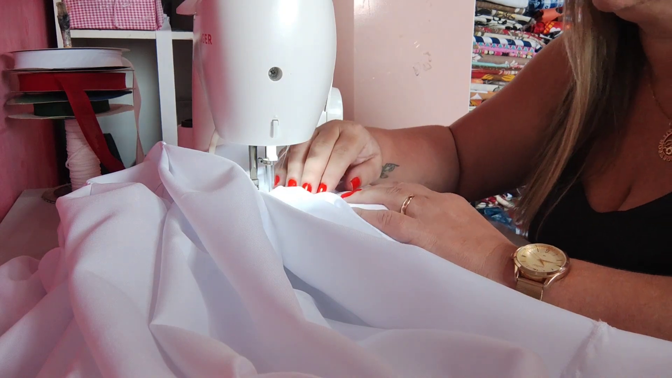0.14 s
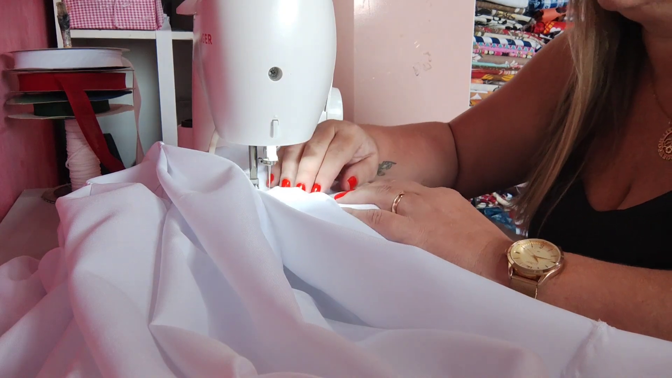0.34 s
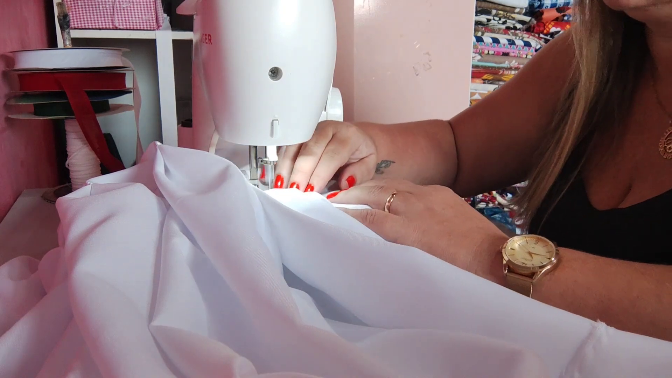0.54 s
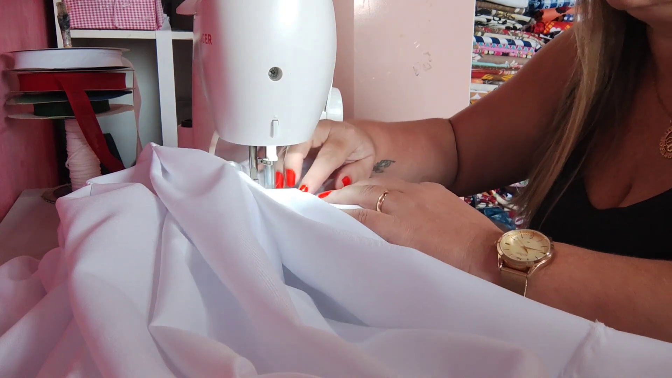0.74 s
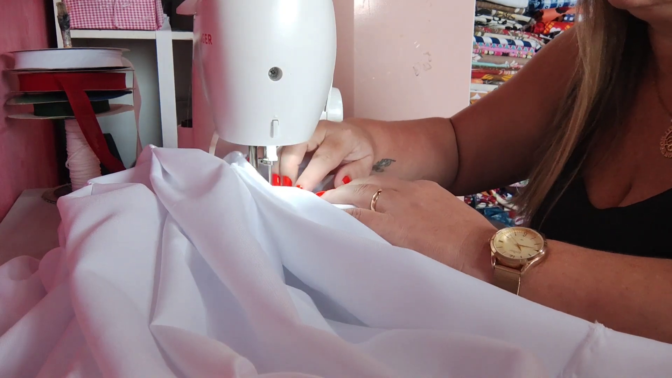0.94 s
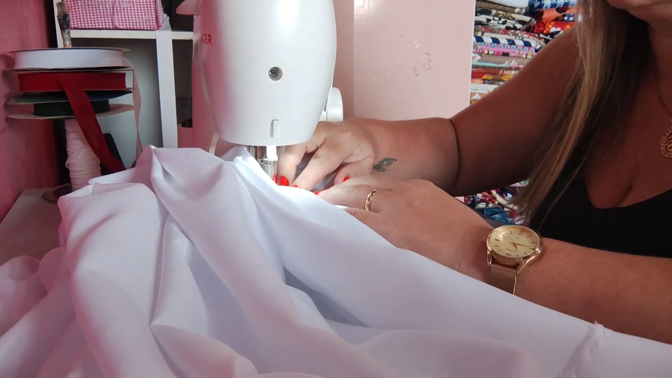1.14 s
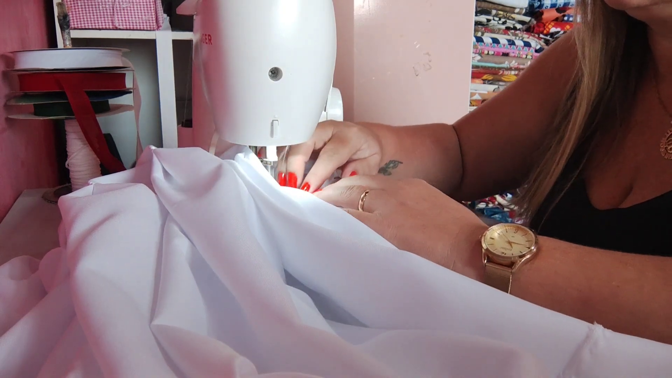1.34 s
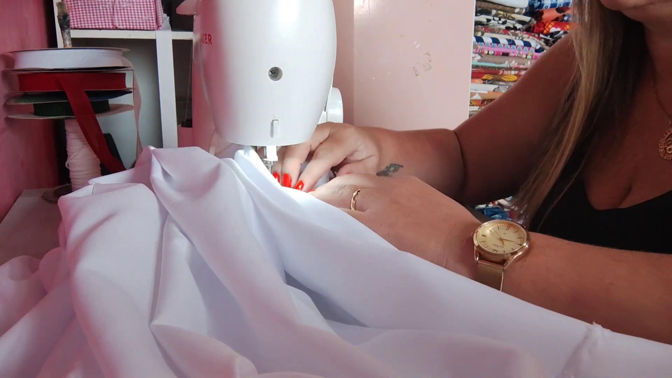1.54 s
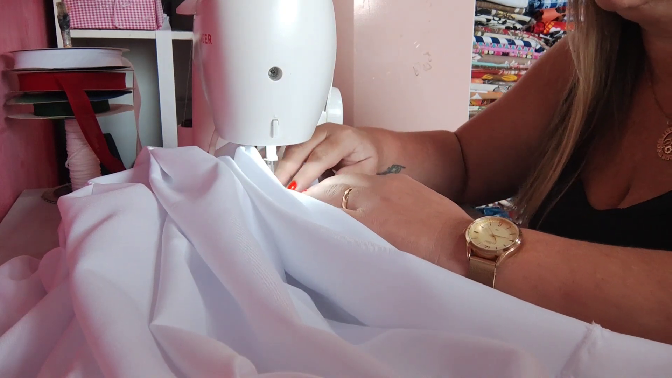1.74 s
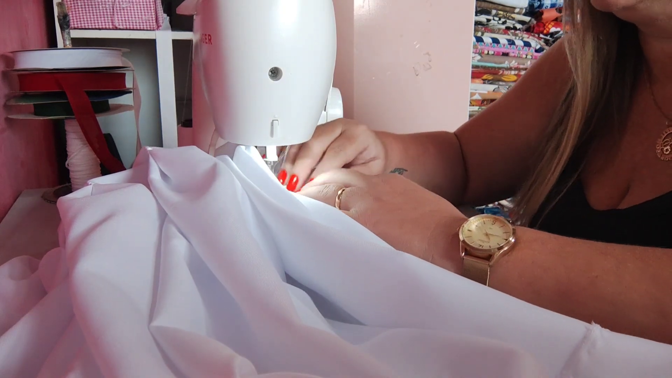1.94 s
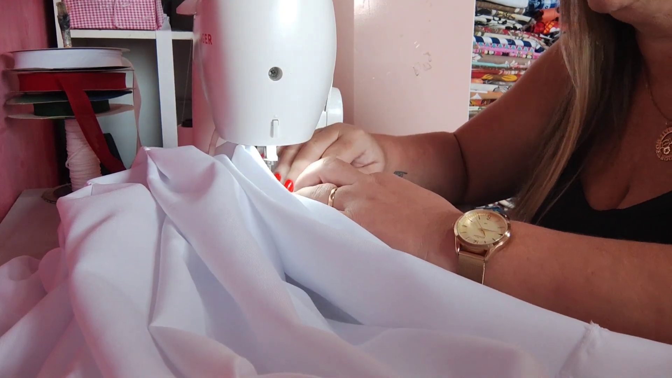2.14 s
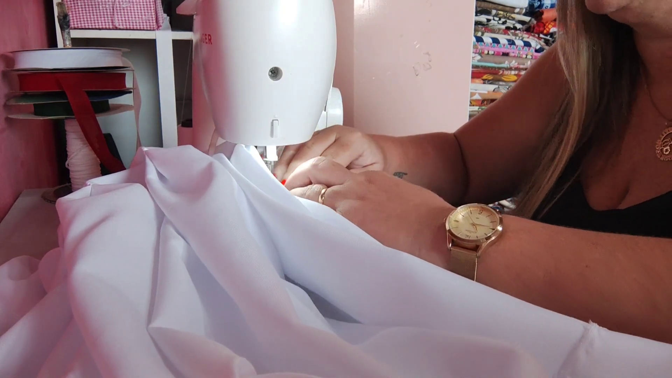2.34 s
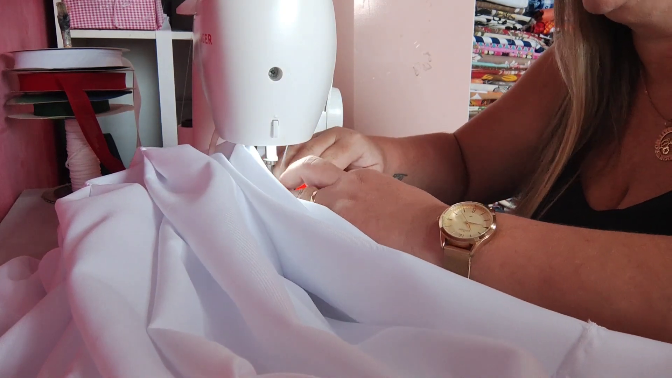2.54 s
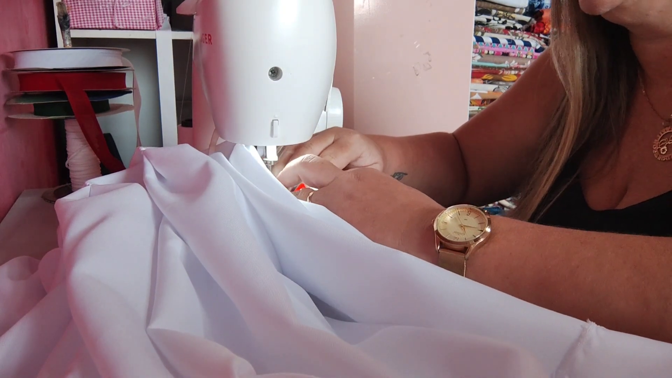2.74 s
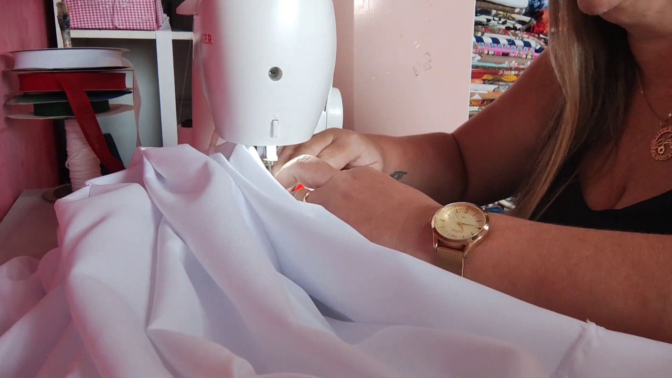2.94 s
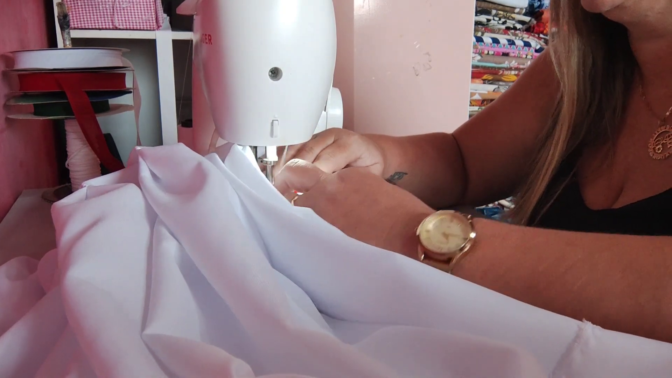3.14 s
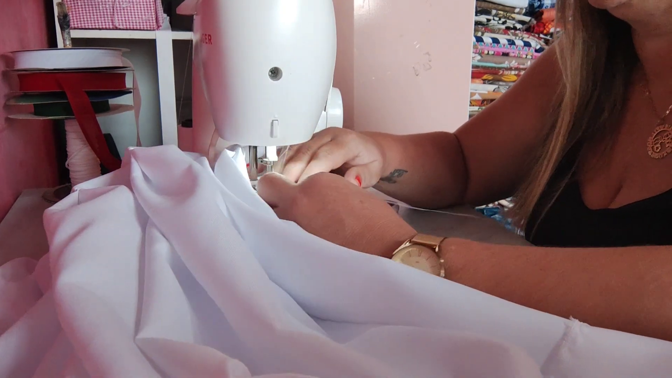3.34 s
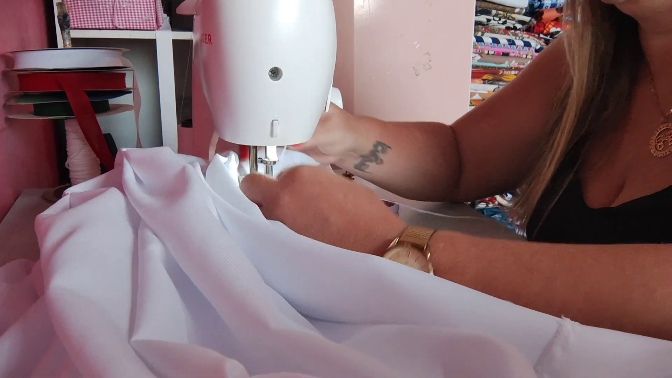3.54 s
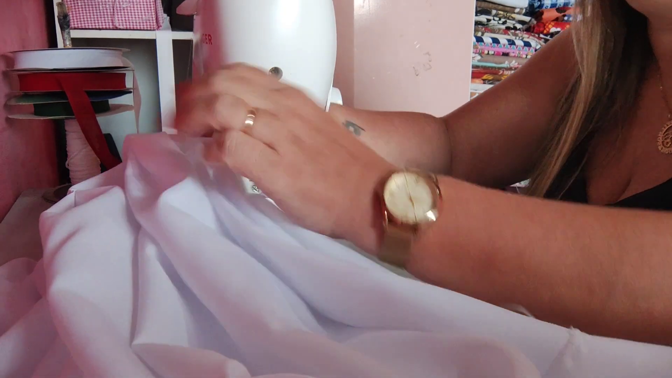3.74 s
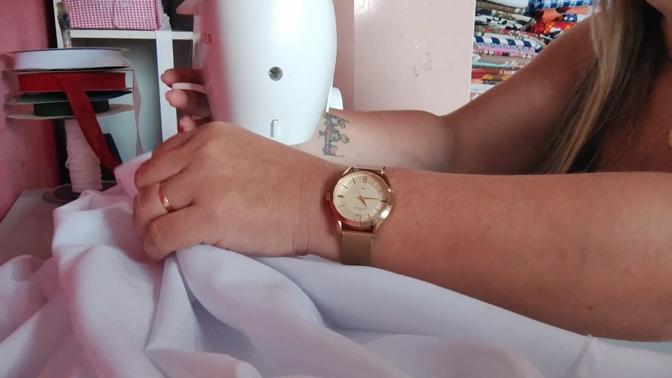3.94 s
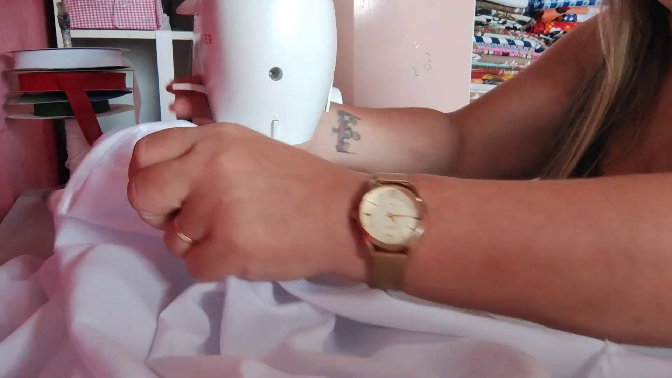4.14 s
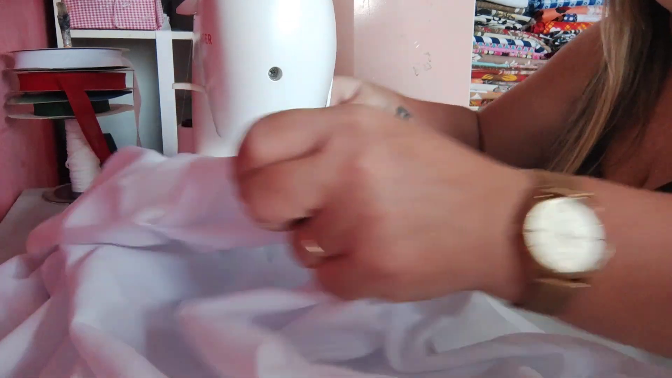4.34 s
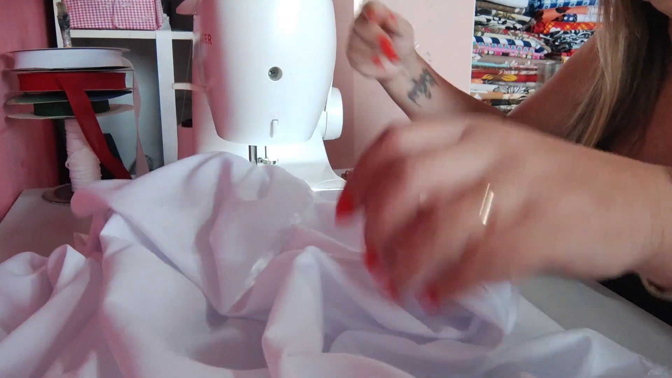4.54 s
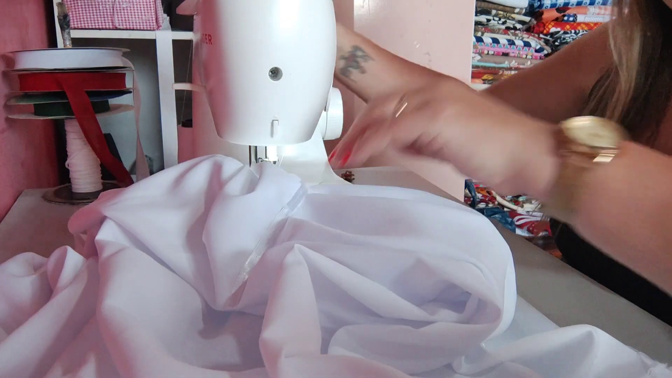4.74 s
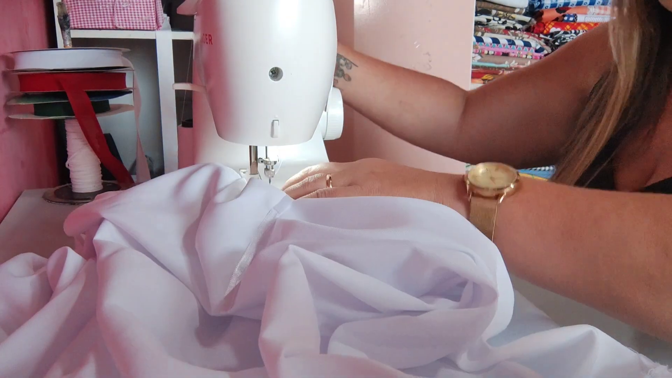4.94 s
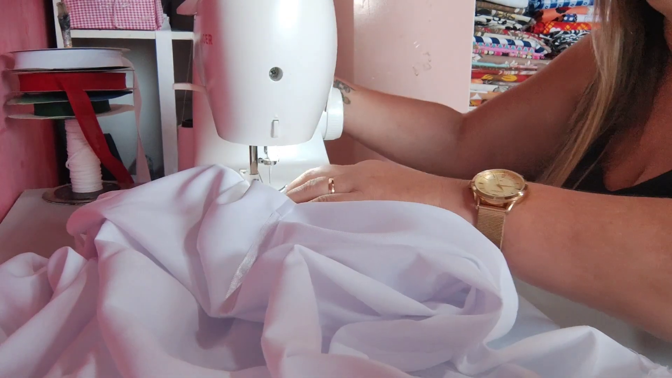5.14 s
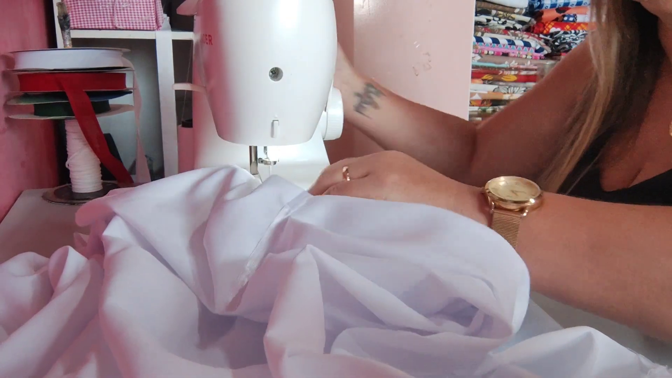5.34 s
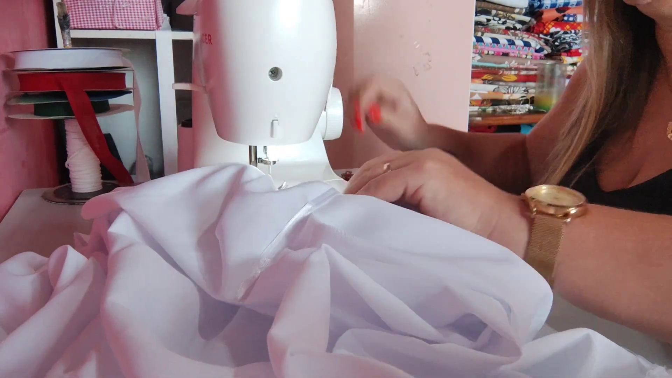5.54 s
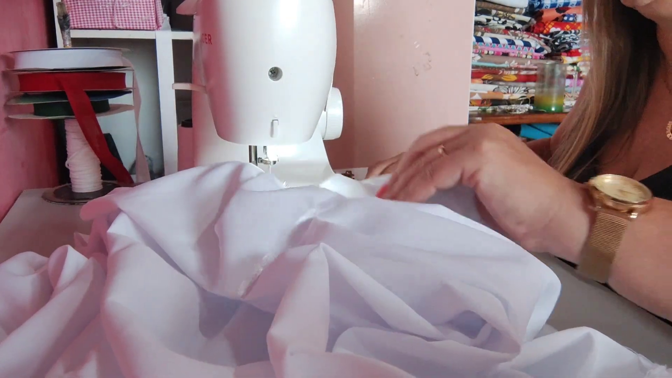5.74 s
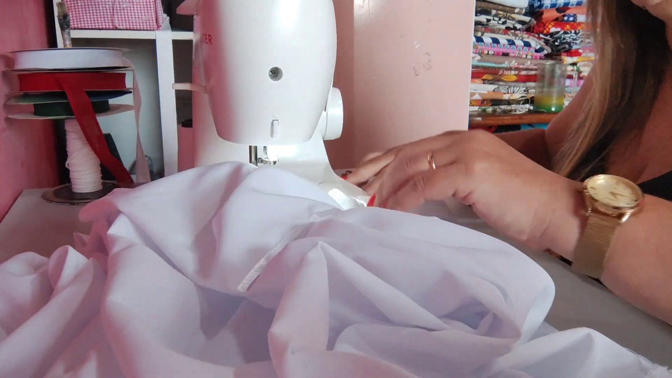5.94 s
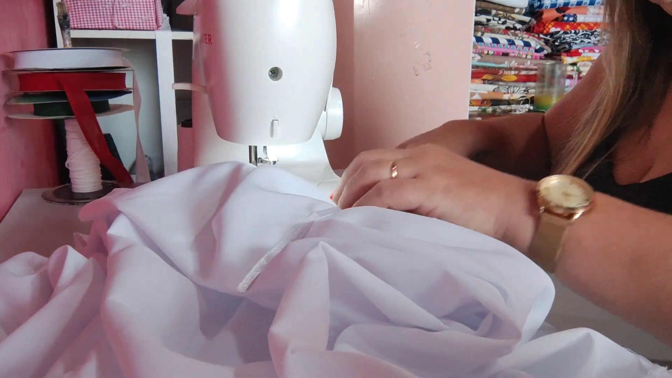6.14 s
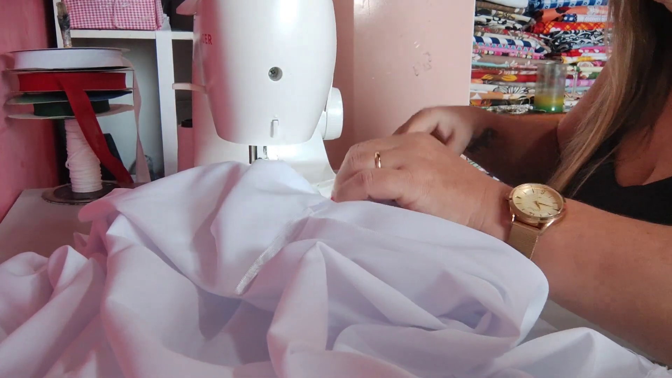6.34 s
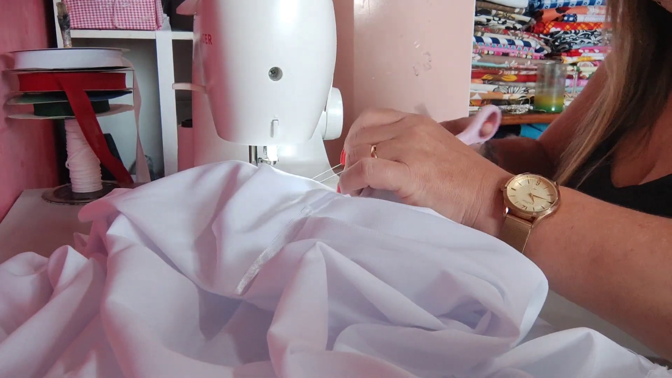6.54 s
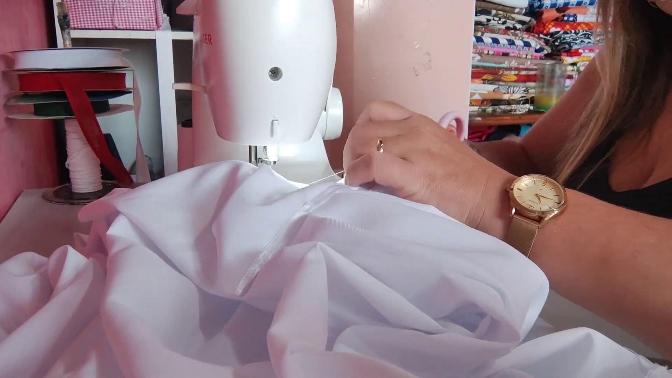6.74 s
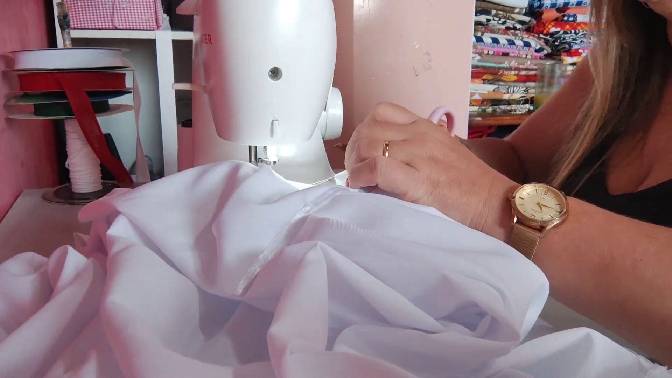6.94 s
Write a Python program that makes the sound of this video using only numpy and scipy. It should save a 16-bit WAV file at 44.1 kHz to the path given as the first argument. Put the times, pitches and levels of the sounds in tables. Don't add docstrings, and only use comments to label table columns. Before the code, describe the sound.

An electric sewing machine rattles steadily up close, winds down to a stop, then levers clack sharply and hands move cloth and scissors.

```python
import sys
import numpy as np
from scipy import signal
from scipy.fft import rfft, irfft, next_fast_len
from scipy.io import wavfile
from scipy.ndimage import uniform_filter1d

SR = 44100
rng = np.random.default_rng(int(sys.argv[2]) if len(sys.argv) > 2 else 0)


def persist_wave(psi):
    counts = np.round(np.clip(psi, -1, 1) * 32767).astype(np.int16)
    wavfile.write(sys.argv[1], SR, np.atleast_2d(counts).T)


def rack_gain(trim_db):
    fader = np.asarray(trim_db, float)
    return 10 ** (fader / 20)


N = 308419
T = np.arange(N) / SR
PADDED = next_fast_len(N, True)
HZ = np.maximum(np.fft.rfftfreq(PADDED, 1 / SR), 1)
SCATTER = 2.33 * np.interp(HZ, np.arange(200) * 120, rng.standard_normal(200))

FULL_SPEED, STOP_S = 11.6, 3.9
MOTOR_TURNS, SEGMENTS = 9, 14
GEAR_LAW = (-27.5, 1.4, 0.57)
START_SETTLES_S = 0.31

# (share of a turn, level [dB])
CONTACTS = [(0.062, 0), (0.171, 1.5), (0.268, 2), (0.523, 4.5), (0.662, 4.5), (.8, 3.5)]
# (frequency [Hz], level [dB per Hz])
WORKS = [(29, -50), (50, -17), (123, -3.5), (209, -6), (332, -1.5), (423, -5.5), (919, -21.5),
         (1060, -18.5), (1170, -26), (1490, -23.5), (1690, -33.5), (6100, -30), (7970, -15.5),
         (15000, -51.5), (16500, -73)]
# (frequency [Hz], width [Hz], level [dB])
PANELS = [(1084, 28, -13), (1920, 320, -8.5), (2310, 43, 4), (3250, 44, -18), (3500, 1100, -9),
          (3950, 66, -8), (4400, 120, -10), (5280, 230, -15), (5800, 190, -14)]
# (frequency [Hz], level [dB per Hz])
CRACK = [(530, -9), (900, -11), (1230, -15), (3110, -18), (3470, -18.5), (6310, -2.5), (6950, 0.5),
         (8350, 7.5), (9660, 2.5), (15500, -24.5), (16500, -49)]
# (frequency [Hz], level [dB per Hz])
AIR = [(35, -51), (60, -17), (80, -31), (113, -5.5), (143, -17.5), (177, -2), (258, -9), (290, -0.5),
       (366, -13), (534, -16), (1240, -28.5), (6010, -34.5), (8750, -21.5), (15400, -52), (16500, -60)]


def rms_one(x):
    return x / np.sqrt(np.mean(x ** 2) + 1e-20)


def in_time(rows):
    s, value = np.transpose(rows)
    return np.interp(T, s, value)


def at_hz(points, hz):
    points = np.array(points)
    return np.interp(np.log(hz), np.log(np.maximum(points[:, 0], 1)), points[:, 1])


def high_pass(x, hz):
    return signal.sosfilt(signal.butter(4, hz, "high", fs=SR, output="sos"), x)


def drift(rate):
    r = np.exp(-80 * np.pi * rate / SR)
    slow = signal.lfilter([1], [1, -2 * r, r * r], rng.standard_normal(N // 40 + 2002))[2000:]
    return np.interp(np.arange(N) / 40, np.arange(len(slow)), rms_one(slow))


def ring(clicks, hz, t60):
    r, w = rack_gain(-60 / (t60 * SR)), 2 * np.pi * hz / SR
    return signal.lfilter([0, np.sin(w)], [1, -2 * r * np.cos(w), r * r], clicks + 1e-18)


def dying(at_s, gains, t60):
    clicks = np.zeros(N)
    clicks[np.round(np.asarray(at_s) * SR).astype(int)] = gains
    return signal.lfilter([1], [1, -rack_gain(-60 / (t60 * SR))], clicks + 1e-18)


def eased(envelope):
    return signal.lfilter([.018], [1, -.982], envelope)


def swells(rows, rise, fall):
    power = 0
    for s, length, db in rows:
        before, after = np.maximum(s - T, 0), np.maximum(T - s - length, 0)
        power = power + rack_gain(db - rise * before - fall * after) ** 2
    return np.sqrt(power)


def struck(at_s, db, modes):
    chance = rng.standard_normal((len(at_s), len(modes)))
    out = 0
    for k, (hz, mode_db, t60) in enumerate(modes):
        blows = dying(at_s, rack_gain(db + mode_db + 2.5 * chance[:, k]), 1e-4)
        out = out + ring(blows, hz, t60)
    return out


def placed(x, lag):
    # (frequency [Hz], left minus right [dB])
    tilt = [(60, 0), (95, -1.0), (150, -2), (240, -2.5), (380, -1.5), (600, -5.5), (950, -4), (1500, -3.5),
            (2380, -0.5), (3770, 0.5), (5980, -5), (9470, 1), (15000, 8)]
    lag_hz = HZ * (0.24 + 0.769 / (1 + (900 / HZ) ** 4))
    turned = np.exp(-2j * np.pi * np.outer([lag, 0], lag_hz) / SR)
    ports = rack_gain(np.outer([.5, -.5], at_hz(tilt, HZ))) * turned
    return irfft(ports * rfft(x, PADDED), PADDED)[:, :N]


def noise(spectrum, low_hz, high_hz, patchy_db, peaks=()):
    # (frequency [Hz], correlation [0-1])
    likeness = [(60, 0.98), (250, 1), (600, 0.64), (1400, 0.22), (3000, 1), (7000, 0.11), (15000, 0.063)]
    one, other = rfft(rng.standard_normal((2, PADDED)))
    alike = np.clip(at_hz(likeness, HZ), 0, 1)
    pair = np.array([one, alike * one + np.sqrt(1 - alike ** 2) * other])
    pair[0] *= np.exp(1j * SCATTER * np.clip(HZ / 900 - .6, 0, 1))
    shape = rack_gain(at_hz(spectrum, HZ)) / (1 + (low_hz / HZ) ** 6) / (1 + (HZ / high_hz) ** 6)
    shape = shape * (1 + sum(rack_gain(db) * 3 / (1 + (2 * (HZ - hz) / width) ** 2) for hz, width, db in peaks))
    out, together = 0, drift(5.1)
    for octave in range(int(np.log2(low_hz)) - 1, min(int(np.log2(high_hz)) + 2, 15)):
        share = np.cos(np.pi / 2 * np.clip(np.log2(HZ) - octave, -1, 1)) ** 2
        flicker = rack_gain(patchy_db * (0.25 * together + drift(10.7)))
        out = out + irfft(pair * shape * share, PADDED)[:, :N] * flicker
    return rms_one(out)


def compressor():
    # (multiple of rotor, multiple of mains buzz, level [dB])
    hum_lines = [(1, 0, -67), (2, 0, -44.5), (0, 1, -49.5), (3, 0, -50.5), (1, 1, -45), (4, 0, -56.5),
                 (2, 1, -56.5), (5, 0, -51), (3, 1, -64)]
    rotor_hz, buzz_hz, fan_hz, beat_crest_s = 57.37, 120.02, 103.0, 4.745
    since = 2 * np.pi * (T - beat_crest_s)
    hum = rack_gain(-48) * np.cos(since * fan_hz + 2.4)
    for k, m, db in hum_lines:
        hum = hum + rack_gain(db + 1.3 * drift(3.0)) * np.cos(since * (k * rotor_hz + m * buzz_hz))
    return hum


def loose_panel():
    # (time [s], peak level [dB])
    knock_rows = [(6.506, -43), (6.561, -41), (6.577, -34.5), (6.593, -34), (6.611, -36), (6.628, -36),
                  (6.646, -35), (6.664, -35), (6.68, -41), (6.699, -41), (6.72, -46), (6.77, -46),
                  (6.791, -46)]
    modes = [(190, 5, .03), (420, 1, .02), (620, 2, .02), (820, -1, .018)]     # Hz, dB, t60 s
    return high_pass(struck(*np.transpose(knock_rows), modes), 110)


def workroom():
    # (time [s], level [dB])
    gate_curve = [(0, -1), (3.1, -3), (3.4, 8), (3.85, 6), (3.96, 4.5), (4.39, 2.5), (4.7, 1.5),
                  (5.34, 2.7), (5.62, -1), (5.74, 1.5), (6.12, 0.5), (6.31, -0.5), (6.74, 5), (6.8, -1),
                  (6.92, 3.5), (6.935, -6), (6.99, -6)]
    # (time [s], length [s], dull level [dB], bright level [dB])
    cloth_moves = [
        (0.315, 3.18, -45.5, -34),
        (3.842, 0.59, -41.5, -42.5),
        (5.005, 0.37, -48, -53.5),
        (5.495, 0.049, -47, -53),
        (5.706, 0.016, -43, -50.5),
        (6.092, .05, -40.5, -53.5),
        (6.578, 0.14, -43, -56),
    ]
    rise, fall = 62, 37
    gain_db = in_time(gate_curve)
    dull_moves = [(s, length, db) for s, length, db, _ in cloth_moves]
    bright_moves = [(s, length, db) for s, length, _, db in cloth_moves]
    dull_gain = rack_gain(-58.5 + 0.2 * gain_db) + swells(dull_moves, rise, fall)
    bright_gain = rack_gain(-52.5 + 0.24 * gain_db - (T - STOP_S)) + swells(bright_moves, rise, fall)
    low_air = rack_gain(-63.0) * noise(AIR, 30, 60, patchy_db=-3.0)
    low_air = low_air + rack_gain(-43.5) * noise(AIR, 57, 166, patchy_db=1.2)
    dull = dull_gain * noise(AIR, 290, 2570, patchy_db=1.5, peaks=[(1093, 10, 4.5), (1520, 89, 0)])
    bright = bright_gain * noise(AIR, 1200, 19000, patchy_db=.6)
    hum = compressor()
    level_db = 10 * np.log10(uniform_filter1d(hum ** 2, size=1500) + 1e-9)
    gate = rack_gain(.8 * np.minimum(level_db + 45, 0) * np.clip((T - 4.4) * 5, 0, 1))
    return gate * (rack_gain(gain_db) * (hum + low_air) + dull + bright) - loose_panel()


def thumps():
    # (time [s], peak level [dB], pitch [Hz])
    hand_thumps = [(5.399, -41, 293), (5.455, -38, 334), (5.67, -33, 345), (5.729, -32, 234),
                   (5.77, -33, 293)]
    return sum(ring(eased(dying([at], [rack_gain(db)], .006)), hz, .06) * 0.095 for at, db, hz in hand_thumps)


def scissors():
    # (time [s], level [dB], pitch [Hz], t60 [s])
    handle_rings = [(5.9385, -39, 2150, 0.046), (5.953, -40, 2250, .12), (5.97, -36, 3300, .06),
                    (5.985, -46, 2180, .1), (6.059, -29, 2170, .04), (6.072, -26.5, 526, 0.075),
                    (6.117, -33, 2180, .04), (6.1862, -39, 1890, 0.14), (6.1865, -38, 4300, .04),
                    (6.178, -26.5, 398, .05)]
    # (time [s], length [s], level [dB])
    drag_rows = [
        (5.94, 0.13, -41.5),
        (6.057, .012, -39.5),
        (6.15, 0.19, -50),
    ]
    rings = sum(ring(dying([at], [rack_gain(db)], .001), hz, t60) * .2 for at, db, hz, t60 in handle_rings)
    grit = rack_gain(4.5 * drift(130))
    scrape = noise(AIR, 430, 9100, patchy_db=-1.5, peaks=[(2230, 300, -5.5), (3430, 2000, -20)])
    return rings + swells(drag_rows, 2500, 400) * grit * scrape


def levers():
    # (frequency [Hz], level [dB], t60 [s])
    reverse_lever = [(339, -6, .12), (560, -5, .08), (610, -4, .07), (727, 0.5, .07), (1500, -12, .04),
                     (2030, -10, .03), (2800, -13, .05), (3520, -5, 0.045), (4030, -9, 0.047),
                     (4420, -8, .03)]
    # (frequency [Hz], level [dB], t60 [s])
    foot_lever = [(259, 2, .066), (463, -3, .034), (760, -10, .04), (990, -16, 0.037), (1470, -20, .05),
                  (4500, -17, .025), (5300, -16, .03), (6300, -16, .03), (14500, -20, .02)]
    return struck([3.941], -23, reverse_lever) + struck([4.871], -22, foot_lever)


def clacks():
    # (time [s], bright crack level [dB], mid crack level [dB], thud level [dB], thud pitch [Hz])
    clack_rows = [(3.8768, -19, -30, -43, 388), (3.912, -10, -45, -31, 345),
                  (3.9404, -3.5, -18.5, -24, 337), (4.868, -12, -24, -18.5, 479),
                  (4.8705, -8, -24, -27, 299), (4.8743, -19, -20.5, -18, 250), (5.0162, -44, -39, -33, 311),
                  (5.276, -27, -35, -38.5, 410), (5.304, -31, -45, -39, 297), (5.578, -36.5, -59, -59, 285),
                  (5.6155, -35, -68, -64, 291), (5.671, -35, -61, -44, 343), (5.9392, -32, -31, -33, 276),
                  (5.952, -38, -38, -36, 310), (6.021, -35, -45, -35, 358), (6.058, -28, -47, -30, 235),
                  (6.075, -49, -55, -32, 302), (6.116, -33, -23.5, -32.5, 318), (6.186, -23, -24, -35, 298),
                  (6.2125, -22.5, -35, -40, 377)]
    # (frequency [Hz], level [dB], t60 [s])
    steel = [(1468, -24.5, 0.082), (2270, -24, 0.042), (2630, -58, 0.04), (4500, -36, 0.02),
             (6760, -22, 0.029), (7920, -2, 0.023), (11100, -32, 0.12)]
    # (multiple of thud pitch, level [dB], t60 [s])
    overtones = [(1.66, -2.5, .08), (1.8, -5, 0.097), (2.15, -1.5, .07)]
    s, bright_db, mid_db, thud_db, low_hz = np.transpose(clack_rows)
    bright = dying(s, rack_gain(bright_db - 2.0), 0.023) + dying(s, rack_gain(bright_db - 24.0), 0.31)
    mid = dying(s, rack_gain(mid_db - 6.0), 0.014) + dying(s, rack_gain(mid_db - 20.5), 0.32)
    dull = dying(s, rack_gain(thud_db + 3.5), 0.011) + dying(s, rack_gain(thud_db - 19.0), 0.49)
    out = noise(CRACK, 5200, 18000, patchy_db=-3.5) * eased(bright)
    out += noise(CRACK, 1100, 4250, patchy_db=-5.0) * eased(mid)
    out += noise(AIR, 274, 2200, patchy_db=-1.0) * eased(dull)
    chance = rng.standard_normal((len(s), len(steel)))
    for k, (hz, db, t60) in enumerate(steel):
        out += ring(dying(s, rack_gain(bright_db + db - 8 + 3 * chance[:, k]), 1e-4), hz, t60)
    for k, start in enumerate(np.round(s * SR).astype(int)):
        push = np.pad(np.hanning(30) * rack_gain(thud_db[k] - 25.5), (0, SR // 2))
        thud = ring(push, low_hz[k], 0.15)
        for ratio, db, t60 in overtones:
            thud = thud + rack_gain(db) * ring(push, low_hz[k] * ratio, t60)
        out[:, start:start + len(thud)] += thud[:N - start]
    return out


def handled():
    return high_pass(clacks() + levers() + scissors() + thumps(), 225)


def shaft():
    # (time [s], speed [stitches per s])
    speed_curve = [(0, 8.6), (.12, 9.8), (.21, 11.69), (1.6, 11.64), (1.9, 11.57), (2.3, 11.57),
                   (3.17, 11.61), (3.3, 10.7), (3.43, 9.05), (3.47, 8.9), (3.56, 7.9), (3.6, 7.0),
                   (3.66, 6.25), (3.71, 5.6), (3.755, 5.15), (3.785, 4.55), (3.83, 4.4), (3.9, 4.0)]
    # (time [s], level [dB])
    load_curve = [(0, -2), (.05, 0.5), (.14, -2), (.25, 0.5), (.6, 0), (1.1, 1), (1.3, 0.5), (1.35, 1.2),
                  (1.4, -3.5), (1.44, 2), (2.1, 1), (2.74, 2), (2.77, -1), (2.82, 0.7), (3.2, 1),
                  (3.45, -3), (3.65, 2), (3.86, 1)]
    top_of_stroke_s = .7332
    speed = in_time(speed_curve)
    turns = np.cumsum(speed) / SR
    turns = turns - turns[round(top_of_stroke_s * SR)]
    run_out_db = np.maximum(-700 * np.maximum(T - STOP_S, 0), -60)
    return speed, turns, in_time(load_curve), run_out_db


def running_db(drive, db, power, load_share):
    speed, _, load_db, run_out_db = drive
    return db + 20 * power * np.log10(speed / FULL_SPEED) + load_share * load_db + run_out_db


def once_a_turn(turns, share):
    return np.flatnonzero(np.diff(np.floor(turns - share)))


def start_rock(turns, share):
    return np.exp(-T / START_SETTLES_S) * np.cos(2 * np.pi * (turns - share))


def load_waves(turns):
    stroke = np.cos(2 * np.pi * (turns - .15))
    armature = np.cos(2 * np.pi * (MOTOR_TURNS * turns - .3))
    return stroke, armature


def linkage(turns):
    # (frequency [Hz], level [dB], t60 [s])
    body = [(93, -46, 0.066), (129.1, -1.5, 0.49), (172.5, -4, 0.54), (204.3, -6.5, 0.31), (270.6, 0, 0.11),
            (334.1, 1, 0.15), (388, -6.5, 0.29), (544.6, 0, 0.21), (610.5, -1.5, 0.079), (775, -12, 0.14)]
    knocks = 0
    for hz, db, t60 in body:
        clicks = np.zeros(N)
        for share, contact_db in CONTACTS:
            at = once_a_turn(turns, share)
            clicks[at] += rack_gain(contact_db + db + 3.2 * rng.standard_normal(60)[:len(at)])
        knocks = knocks + ring(clicks, hz, t60)
    return rms_one(signal.lfilter([.1], [1, -.9], knocks))


def table_rumble(drive):
    turns = drive[1]
    level_db = running_db(drive, -24, 1.66, 1.1) + 5 * start_rock(turns, .17)
    rumble = rack_gain(-4.0) * linkage(turns) + rack_gain(-1.0) * noise(WORKS, 68, 400, patchy_db=.4)
    return rack_gain(level_db) * rumble * (1 + dying([3.195], [0.56], 0.23))


def gear_train(drive):
    turns = drive[1]
    stroke, armature = load_waves(turns)
    touches = np.concatenate([once_a_turn(turns, share) for share, _ in CONTACTS])
    jolts = dying(touches / SR, rng.random(400)[:len(touches)] ** 2, 0.023)
    gears = noise(WORKS, 512, 3580, patchy_db=1.0, peaks=PANELS)
    gears = gears * rack_gain(1.2 * stroke + 0.25 * armature) * (1 + 1.27 * jolts)
    return rack_gain(running_db(drive, *GEAR_LAW) - 1.5) * gears


def brush_hiss(drive):
    turns = drive[1]
    stroke, armature = load_waves(turns)
    ripple_db = 0.59 * stroke + 1.9 * armature + 0.24 * np.cos(2 * np.pi * (8 * turns - .1))
    hiss = noise(WORKS, 3320, 17000, patchy_db=1.0, peaks=PANELS) * rack_gain(ripple_db + 2.04 * drift(210))
    return rack_gain(running_db(drive, -28.5, 1.9, 0.1) + 2.0) * hiss


def cover_plate(drive):
    # (frequency [Hz], level [dB], t60 [s])
    plate_modes = [(2200, -2, .022), (2340, 0, .022), (1545, -8, .03), (2900, -5, .02)]
    passes = np.diff(np.floor(MOTOR_TURNS * drive[1]), prepend=0) > 0
    knocks = passes * rack_gain(2.5 * rng.standard_normal(N))
    plate = rms_one(sum(rack_gain(db) * ring(knocks, hz, t60) for hz, db, t60 in plate_modes))
    return plate * rack_gain(running_db(drive, -44.5, .15, 0.22))


def needle_ticks(speed):
    # (time [s], snap level [dB], needle-plate ring level [dB])
    tick_rows = [(0.0383, -21.5, -40), (0.1313, -23, -41), (0.2189, -23, -37), (0.2309, -23.5, -36),
                 (0.3032, -24, -37), (0.3894, -31, -38), (0.4752, -22, -35), (0.5615, -23, -29),
                 (0.6464, -24, -35), (0.7334, -19, -30), (0.8195, -25, -35), (0.8979, -23, -30),
                 (0.9894, -27, -35), (1.076, -27, -34), (1.1614, -22, -34), (1.2502, -20.5, -28),
                 (1.335, -20, -34), (1.4192, -30, -38), (1.505, -24, -35), (1.5908, -21.5, -33),
                 (1.6766, -27, -30), (1.7614, -23, -22), (1.8477, -22.5, -33), (1.9336, -25, -32),
                 (2.0117, -27, -36), (2.1076, -28, -35), (2.1963, -22, -38), (2.2817, -20.5, -19),
                 (2.3688, -21.5, -35), (2.454, -22.5, -34), (2.5416, -20.5, -33), (2.628, -24.5, -20),
                 (2.7152, -31, -40), (2.8025, -26, -36), (2.8942, -22, -35), (2.9724, -26, -34),
                 (3.0594, -24.5, -36), (3.1424, -29, -40), (3.2226, -26, -35), (3.3164, -21.5, -38),
                 (3.4161, -30, -38), (3.43, -24.5, -39), (3.4421, -24, -39), (3.5598, -31, -40),
                 (3.6381, -25, -41), (3.7234, -33, -46)]
    # (frequency [Hz], level [dB], t60 [s])
    snap_modes = [(7600, -3, .007), (9700, -1, 0.0065), (11000, -7, .005)]
    # (frequency [Hz], level [dB], t60 [s])
    plate_ring = [(3970, -7, .03), (4530, -1, 0.03), (5550, -7, .012)]
    # (frequency [Hz], level [dB], t60 [s])
    take_up = [(5700, -27, .012), (6300, -28, .01), (7900, -25, .008)]
    s, db, ring_db = np.transpose(tick_rows)
    db = db + .4 * (db - db.mean())
    strikes = dying(s, rack_gain(db + 3), 0.014) + dying(s, rack_gain(db - 3.5), 0.12)
    ticks = noise(CRACK, 4900, 16000, patchy_db=0.0, peaks=[(10600, 2400, -0.5), (4860, 3300, 3)]) * strikes
    ticks = ticks + struck(s, db, snap_modes) + struck(s, ring_db, plate_ring)
    ticks = signal.sosfilt(signal.butter(1, 12000, fs=SR, output="sos"), ticks)
    answer_db = 20 * np.log10(speed[(s * SR).astype(int)] / FULL_SPEED)
    return ticks + struck(s + .0235, answer_db, take_up)


def motor_whine(drive):
    # (frequency [Hz], width [Hz], level [dB])
    whine_peaks = [(560, 40, -41), (665, 55, -37), (810, 130, -39), (1120, 30, -41), (960, 60, -50)]
    # (multiple of motor turns, level [dB])
    orders = [(5, -45), (6, -49), (10, -50), (12, -53), (13, -57), (15, -57), (17, -57), (19, -57),
              (21, -54), (22, -52), (23, -59), (28, -57), (38, -60), (42, -56), (47, -60), (51, -59),
              (55, -59)]
    pedal_up_s = 3.18
    speed, turns, load_db, run_out_db = drive
    whine_hz = SEGMENTS * MOTOR_TURNS * speed
    coasting = rack_gain(-56)
    for hz, width, db in whine_peaks:
        coasting = coasting + rack_gain(db) / (1 + (2 * (whine_hz - hz) / width) ** 4)
    driven = rack_gain(-47 + 1.5 * load_db)
    gain = np.where(T < pedal_up_s, driven, coasting) * rack_gain(run_out_db)
    uneven = turns + .001 * np.clip((T - 3.2) * 4, 0, 1) * np.sin(2 * np.pi * turns)
    phase = 2 * np.pi * SEGMENTS * MOTOR_TURNS * uneven + .7 * drift(9)
    whine = uniform_filter1d(gain, size=400) * rack_gain(2.5 * drift(14)) * np.cos(phase)
    spin = rack_gain(running_db(drive, *GEAR_LAW) + 23.5)
    for order, order_db in orders:
        phase = 2 * np.pi * order * MOTOR_TURNS * turns + .9 * drift(8)
        whine = whine + spin * rack_gain(order_db + 3.5 * drift(12)) * np.cos(phase)
    return whine


def machine():
    drive = shaft()
    head = table_rumble(drive) + gear_train(drive) + brush_hiss(drive)
    head = head + needle_ticks(drive[0]) + cover_plate(drive)
    motor = rack_gain(3.0) * motor_whine(drive) * rack_gain([[-1.2], [1.2]])
    return placed(head, 17) + placed(motor, 0.31)


def scene():
    return machine() + placed(handled() + workroom(), 0)


def top_cut(x):
    return signal.sosfilt(signal.butter(12, 16820, fs=SR, output="sos"), x)


def record(dry):
    # (frequency [Hz], level [dB])
    top_end = [(8800, -1.92), (9600, -4.5), (10500, -3), (11500, -3.5), (12500, -0.5), (13500, 1.5),
               (14800, 8.5), (16000, 5), (16500, -26), (16800, -40)]
    voiced = irfft(rfft(dry, PADDED) * rack_gain(at_hz(top_end, HZ)), PADDED)[:, :N]
    return top_cut(high_pass(voiced, 48))


dry = scene()
out = record(dry)
persist_wave(out)
```